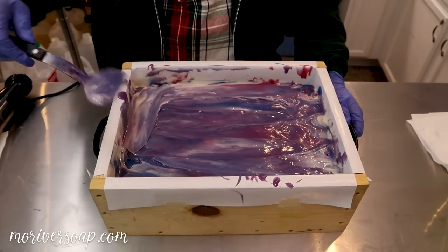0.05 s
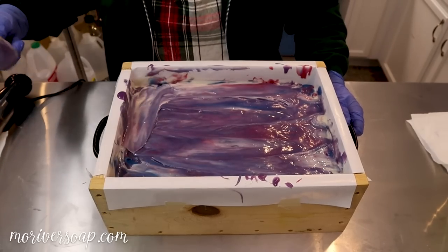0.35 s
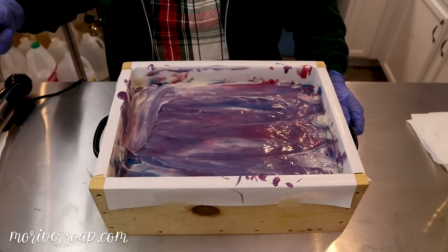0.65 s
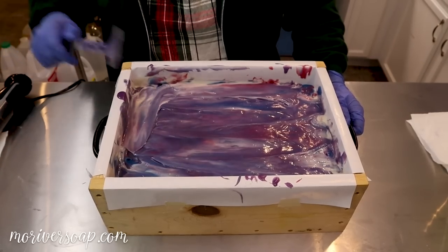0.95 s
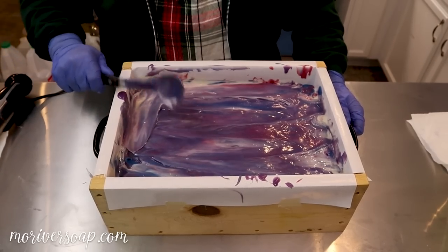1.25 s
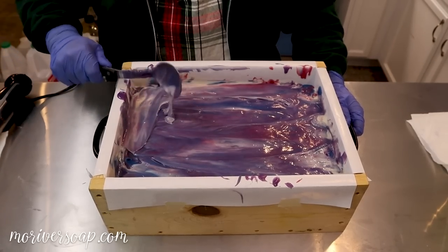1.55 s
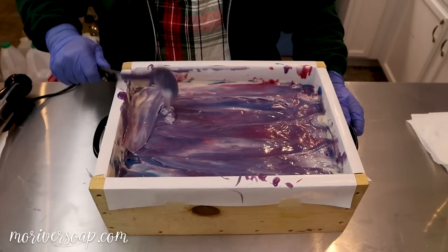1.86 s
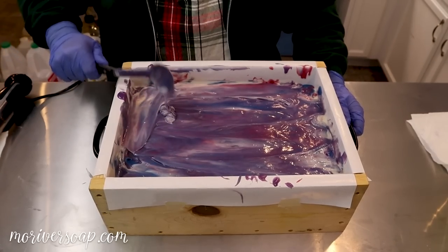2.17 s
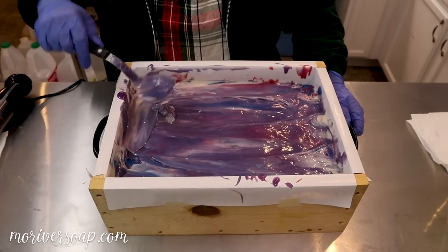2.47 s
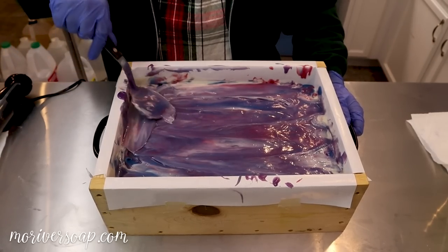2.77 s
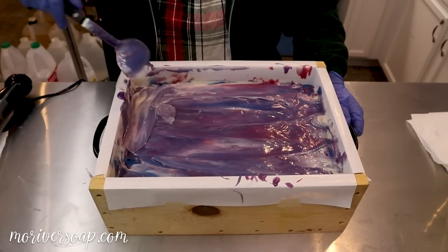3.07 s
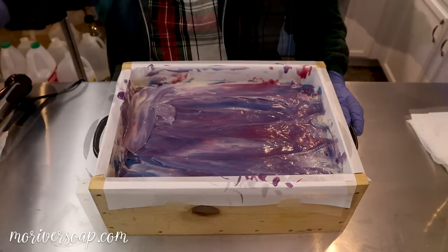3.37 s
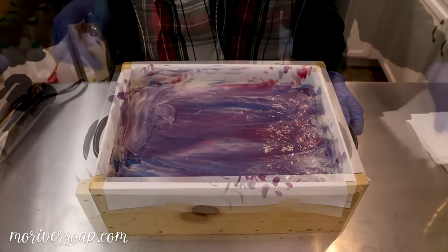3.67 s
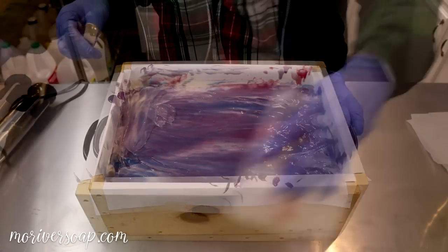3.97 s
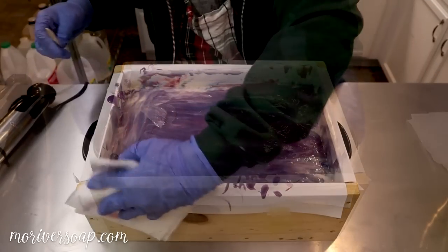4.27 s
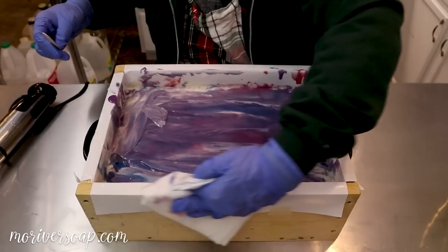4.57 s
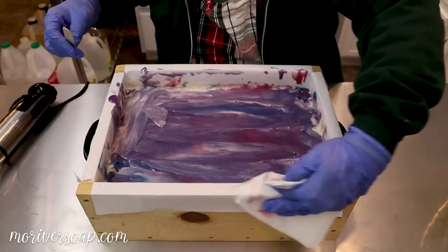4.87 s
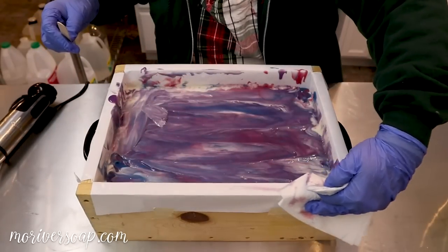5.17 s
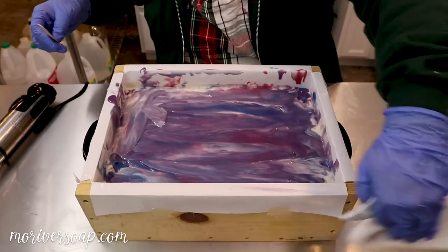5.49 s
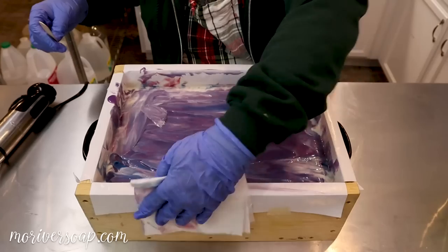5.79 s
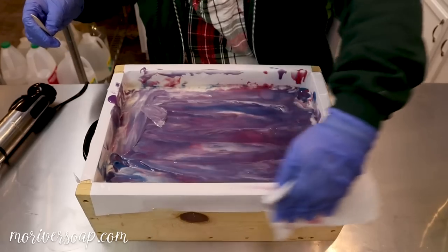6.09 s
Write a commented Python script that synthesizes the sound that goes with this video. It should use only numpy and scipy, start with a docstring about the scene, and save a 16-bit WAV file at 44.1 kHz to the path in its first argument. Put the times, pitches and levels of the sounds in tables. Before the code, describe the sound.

A metal spoon raps hard eight times on a wooden mold, quick and even, making the wood and the steel bench under it ring. A softer, dull knock and a light metal clink follow. Then the mold is bumped and a paper towel hisses along its paper-lined rim in several strokes, with small catches and one sharp crack. The microphone is close, in a small, hard-walled room.

```python
"""Rapping a spoon on a soap mold

A spoon raps eight times on a wooden mold to shake off thick batter; the wood and its steel bench ring.
A dull knock and a metal clink follow as the spoon is put away. The mold is bumped, and a paper towel
hisses along its paper-lined rim, catching as it goes. The room is small and hard. The raps overload
the one close microphone, and a faint hiss sinks after them and slowly returns."""
import sys
import numpy as np
from scipy import signal
from scipy.fft import rfft, irfft
from scipy.io import wavfile

SR = 44100
rng = np.random.default_rng(int(sys.argv[2]) if len(sys.argv) > 2 else 0)


def store_pcm(level_fs):
    """Save levels as 16-bit WAV."""
    pcm = np.round(np.clip(level_fs, -1, 1) * 32767).astype(np.int16)
    wavfile.write(sys.argv[1], SR, np.atleast_2d(pcm).T)


N = 275184
TIME, HZ = np.arange(N) / SR, np.fft.rfftfreq(N, 1 / SR)
TOP_HZ = 15900  # upper edge of the treble


def spoon_raps():
    """Eight hard raps on the mold, then one soft, dull knock."""
    # (time [s], wood level [dB], bench level [dB], place [0 mid-wall to 1 stiff corner],
    #  clack level [dB], clack brightness [dB per octave], pitch of the knock [factor])
    blows = [(1.2078, 0.5, 1, 0.14, -7.5, -2, 0.89), (1.3814, 0.5, 2, 0.03, 0, -1.5, 1),
             (1.5402, 3, .5, 0.25, 1, 6, 1.07), (1.7052, 1.5, 1, 0.72, -4, 0, 1.07),
             (1.8649, -3.5, .5, 0, -5, 0, 0.99), (2.0256, 0, -1.5, 1, 0, -7.5, 1.04),
             (2.187, 0, -1.5, 0.94, -6.5, -4.5, 1.038), (2.3516, 0, 1.5, 0.76, -8.5, -2.5, 0.99),
             (2.9264, -8, -24, .12, -31.5, -10.5, 0.884)]
    out = np.zeros(N)
    for s, *blow in blows:
        add(out, *knock(s, *blow))
    return out


def knock(s, wood_db, bench_db, place, clack_db, tilt_db, pitch, lead_s=0.0009):
    """The spoon clacks just before the wood answers; gives the start time and the sound with its echo."""
    # tone of the spoon hitting the rim: (frequency [Hz], level [dB])
    clack_tone = [(1500, -12), (2600, 6.5), (3800, 3.5), (5000, 2), (6000, 4.5), (8500, 3), (9600, 1),
                  (10600, -18), (14000, -10.5), (16000, -24.5)]
    wood = np.zeros(SR)
    add(wood, lead_s, mold_and_bench(wood_db, bench_db, place, pitch))
    tilted_tone = [(hz, db + tilt_db * np.log2(hz / 6000)) for hz, db in clack_tone]
    clack = amp(clack_db - 6) * colour(burst(length_s=0.0019), tilted_tone)
    echo = room(spread(amp(-5) * (wood + clack)))
    return s - lead_s, wood + clack + echo


def mold_and_bench(wood_db, bench_db, place, pitch, bench_hz=239.7, detune=0.019, scatter_db=2):
    """Struck wood and steel vibrate: the shortest notes make the knock, longer ones the boom and ring."""
    # natural notes of mold and bench: (frequency [Hz], level [dB], time to fade by 60 dB [s])
    notes = [(58, -43.5, 0.62), (87, -39, 0.15), (106.2, -34.5, 0.4), (120.6, -33, 0.26),
             (163.4, -32, 0.27), (200, -26, 0.039), (229.7, -20, 0.13), (249.4, -28, 0.38),
             (317.4, -32.5, 0.21), (445, -34, 0.078), (525, -32.5, 0.34), (591, -32.5, 0.18),
             (675, -28.5, 0.11), (721.4, -24, 0.18), (798, -27, 0.068), (775, -6.5, 0.025),
             (943, 6, 0.0064), (1193, -3, 0.0099), (1376, 8.5, 0.0086), (1650, -8.5, 0.0082),
             (2112, -7, 0.013), (2903, -11.5, 0.0073), (1510, -24.5, 0.067), (1456, -49, 1.4)]
    # how hard base board, side wall, rim and edge are shaken:
    # (frequency [Hz], level if hit mid-wall [dB], level if hit at a corner [dB])
    parts = [(650, 4, -28.5), (970, .5, 5.5), (1480, -4, -3), (2250, -7, 5.5)]
    hz, db, fade_s = np.transpose(notes)
    drive = [(f, wood_db + mid_db + place * (corner_db - mid_db)) for f, mid_db, corner_db in parts]
    db = db + read([(bench_hz, bench_db)] + drive, hz)  # the bench booms below bench_hz
    short = fade_s < 0.03
    # the spoon presses differently at every blow, nudging the higher ringing notes
    pitch_nudge, level_nudge = rng.standard_normal((2, len(hz))) * (~short & (hz > 400))
    hz = hz * np.where(short, pitch, 1 + detune * pitch_nudge)
    db = db + scatter_db * level_nudge
    return ring(np.transpose([hz, db, fade_s]), rise_s=0.0006)


def spoon_clink():
    """The spoon meets metal: a tick and a quickly fading ring, with their echo."""
    # when it lands: (time [s], level [dB])
    landings = [(3.7337, -17)]
    # natural notes of the spoon on metal: (frequency [Hz], level [dB], time to fade by 60 dB [s])
    notes = [(895, -26, 0.34), (1480, -29, 0.35), (3075, -1.5, 0.022), (2980, -23, 0.1),
             (3400, -4.5, 0.021), (4380, -26, .04), (4700, -16, 0.051), (5200, -2, 0.018),
             (6280, -5, 0.031), (7300, -9, 0.029), (7580, -19, .13), (9060, -9, 0.022), (9870, -10, 0.035),
             (11900, -19, 0.055), (13260, -18, .05), (14700, -19, .04)]
    # tone of the tick: (frequency [Hz], level [dB])
    tick_tone = [(150, -9.5), (420, -9.5), (880, 1.5), (1400, 2), (2000, -0.5), (2600, -7), (4000, -5),
                 (8000, -3.5), (10500, -16), (15500, -21)]
    out = np.zeros(N)
    for s, db in landings:
        metal = ring(notes, rise_s=0.00018)
        tick = amp(8) * colour(burst(length_s=0.0038), tick_tone)
        echo = room(amp(-5) * metal + amp(-2) * spread(tick))
        add(out, s, amp(db) * (metal + tick + echo))
    return out


def mold_bumps():
    """A soft hand nudges the mold and wakes only its low notes."""
    # nudges: (time [s], level [dB])
    nudges = [(4.189, -14), (4.599, -59), (5.139, -47), (5.486, -45), (5.981, -45)]
    # notes of the pushed mold: (frequency [Hz], level [dB], time to fade by 60 dB [s])
    notes = [(75, -30, 0.17), (137, -11, 0.21), (166, -8, 0.16), (196, -2, 0.052), (222, 7.5, 0.042),
             (277, -18, 0.23), (390, -8, 0.075), (540, -6, 0.023)]
    out = np.zeros(N)
    for s, db in nudges:
        add(out, s, amp(db) * ring(notes, rise_s=0.0019, rise_cycles=1.0))
    return out


def towel(fast_stroke_db=-35):
    """Fibres brush the rim in a hiss that brightens with speed; pressure adds a rasp and small slips."""
    # wipes: (start [s], speeding up [s], steady [s], slowing [s], speed [dB],
    #  pressure relative to speed [dB])
    strokes = [(3.875, 0.068, 0.021, 0.029, -34, -10), (4.229, .105, .02, .14, -40, -1),
               (4.34, .24, .42, .29, -34, -10), (5.25, 0.25, 0.01, 0.043, -34, -5),
               (5.625, 0.12, .014, 0.0068, -42.5, -4), (5.773, 0.044, 0.068, 0.024, -38, -6.5),
               (5.91, 0.066, 0.039, 0.14, -37.5, -10.5), (6.0, 0.12, .11, .1, -34.5, -22)]
    # tone of the fine hiss: (frequency [Hz], level [dB])
    hiss_tone = [(1290, -15), (2200, -7.5), (2430, -6.5), (3040, -6.5), (4350, -3.5), (4960, -6.5),
                 (5720, -3.5), (6210, -7), (7090, -3.5), (8370, 0.5), (10400, -14.5), (12700, -11.5),
                 (13600, -14), (16000, -25)]
    # tone of the high fizz of fast strokes: (frequency [Hz], level [dB])
    fizz_tone = [(5000, -37), (9000, 0), (11000, -5), (13500, 4), (16000, -8)]
    # tone of the coarse rasp: (frequency [Hz], level [dB])
    rasp_tone = [(120, -15), (300, -8.5), (600, -0.5), (1200, 6.5), (2000, 5), (3200, -1), (5500, -24.5)]
    speed = sum(gesture(*motion) for *motion, _ in strokes)
    pressure = sum(gesture(*motion) * amp(pressure_db) for *motion, pressure_db in strokes)
    hiss = amp(-1.38) * speed * grains(hiss_tone, per_s=16000)
    fizz = amp(-47) * (speed / amp(fast_stroke_db)) ** 2.1 * noise(fizz_tone)
    rasp = amp(-3) * pressure * grains(rasp_tone, per_s=3000)
    return hiss + fizz + rasp + towel_slips(pressure)


def towel_slips(pressure, per_s=18, centre_hz=1440, spread_octaves=0.35, spread_db=3.5):
    """Small catches at uneven intervals, as strong as the towel is pressed."""
    out = np.zeros(N)
    chances = rng.uniform(-1, 1, (int(N / SR * per_s), 3))
    for k, (late, size, pitch) in enumerate(chances):
        s = (k + 0.5 + 0.5 * late) / per_s
        hz = centre_hz * 2 ** (spread_octaves * pitch)
        add(out, s, amp(9.5 + spread_db * size) * snap(hz, length_s=0.0018))
    return out * pressure


def paper_lining():
    """The stiff paper lining catches on the towel and lets go; once it cracks sharply."""
    # the loudest catches: (time [s], level [dB], pitch [Hz], length [s])
    catches = [(4.392, -28, 2200, .009), (4.401, -22, 1900, .004), (4.413, -25, 1800, .001),
               (4.484, -24, 1530, .0024), (4.53, -24.5, 1570, 0.0019), (4.594, -21.5, 1566, 0.0087),
               (4.604, -20.5, 1390, 0.0035), (4.665, -24, 1320, 0.0022), (4.672, -21.5, 1640, 0.0025),
               (4.738, -27, 1660, 0.0044), (4.769, -27.5, 1220, 0.0033), (4.895, -23, 1290, .0012),
               (4.981, -26, 2040, 0.0056), (5.139, -17.5, 2130, 0.0017), (5.404, -33, 1240, 0.0036),
               (5.483, -21.5, 1240, 0.0041), (5.793, -32, 5000, .0027), (6.173, -22, 1900, 0.0016)]
    # the sharp crack: (time [s], level [dB])
    cracks = [(4.4537, -8.5)]
    # tone of the crack: (frequency [Hz], level [dB])
    crack_tone = [(200, -14), (500, -11), (950, 6), (1600, -5), (3000, 2), (4400, 1.5), (6500, 4.5),
                  (11000, 4.5), (16000, -6)]
    out = np.zeros(N)
    for s, db, hz, length_s in catches:
        add(out, s, amp(db) * snap(hz, length_s))
    for s, db in cracks:
        add(out, s, amp(db) * colour(burst(length_s=0.0018), crack_tone))
    return out


def handling_taps():
    """Faint taps as things are handled."""
    # light touches: (time [s], level [dB], pitch [Hz])
    touches = [(.052, -42.5, 3980), (.118, -48, 5500), (.350, -40, 650), (.435, -39, 550),
               (.461, -46.5, 900), (.619, -42, 1081), (.966, -43, 546), (3.578, -44, 650),
               (3.697, -44, 1000)]
    out = np.zeros(N)
    for s, db, hz in touches:
        add(out, s, amp(db) * snap(hz, length_s=0.0026))
    return out


def movement_and_hiss():
    """A sleeve swishes and the body shuffles, over a faint hiss that sinks after the raps and returns."""
    # the hiss dips and recovers, like a recorder turning itself down and up: (time [s], level [dB])
    hiss_levels = [(0, -56), (.55, -63), (1.2, -58.5), (2.7, -81.5), (3.2, -68.5), (3.7, -63), (4.0, -50.5),
                   (5.3, -54), (5.6, -53), (6.24, -56.5)]
    # a sleeve brushing: (start [s], rise [s], hold [s], release [s], level [dB])
    brushes = [(0.85, 0.068, 0.017, 0.11, -53)]
    # the soap maker shifting about: (start [s], rise [s], hold [s], release [s], level [dB])
    shifts = [(0.142, 0.37, 0.033, 0.2, -52), (0.624, .22, 0.11, 0.33, -55.5),
              (3.45, 0.14, 0.14, 0.17, -59), (3.7, 0.52, .3, 0.2, -48), (5.55, .1, .2, .3, -55)]
    # tone of the swish and the bright part of the hiss: (frequency [Hz], level [dB])
    bright_tone = [(700, -5.5), (1500, 0.5), (3200, 0.5), (5000, -1), (8500, -4), (10500, -8.5),
                   (15500, -15.5)]
    # tone of the shuffle and the dull part of the hiss: (frequency [Hz], level [dB])
    dull_tone = [(100, -11), (250, -4), (380, -9), (515, 3), (680, -6.5), (1200, -13), (3000, -27.5)]
    hiss = amp(np.interp(TIME, *np.transpose(hiss_levels)))
    bright = np.hypot(hiss, sum(gesture(*row) for row in brushes))
    dull = np.hypot(amp(-4) * hiss, sum(gesture(*row) for row in shifts))
    return bright * grains(bright_tone, per_s=7200, spread_db=-1.5) + dull * noise(dull_tone)


def room(x, first_echo_s=0.0017, early_db=3, early_s=0.014):
    """Dense echoes, strongest from the near surfaces, each pitch dying at its own speed."""
    # how long the room rings: (frequency [Hz], time to fade by 60 dB [s])
    fade_times = [(100, 0.62), (500, .42), (1400, 0.48), (4000, 0.46), (8000, 0.42), (15000, 0.06)]
    # tone of the echo: (frequency [Hz], level [dB])
    echo_tone = [(100, -6.5), (270, 0.5), (370, -3.5), (480, 3), (800, -4), (1500, -8), (3000, -7.5),
                 (8000, -8), (15000, -10.5)]
    hz, frame_s, bands = signal.stft(rng.standard_normal(SR), SR, nperseg=256)
    fade = amp(-60 * frame_s / read(fade_times, hz)[:, None])
    tail = signal.istft(bands * fade, SR, nperseg=256)[1][:SR]
    t = TIME[:SR]
    tail = tail * (t > first_echo_s) * amp(early_db * np.exp(-t / early_s))
    tail = colour(tail / np.linalg.norm(tail), echo_tone)
    return signal.fftconvolve(x, tail)[:len(x)]


def background(level_db=-61.5):
    """A faint, steady rumble and hiss."""
    # its tone: (frequency [Hz], level [dB])
    tone = [(15, -35), (25, -4), (92, -0.5), (195, 0.5), (427, -6.5), (531, -5.5), (1290, -14), (1400, -12),
            (1700, -14.5), (6380, -17), (10100, -18.5), (14800, -17.5), (16000, -16.5)]
    return amp(level_db) * noise(tone)


def spread(x):
    """A blow as the room gathers it from all sides: the same energy, with the gaps in its tone filled."""
    power, hz = abs(rfft(x)) ** 2, np.fft.rfftfreq(len(x), 1 / SR)
    tone = []
    for centre in np.geomspace(50, 17000, 50):
        nearby = (hz > centre / 1.15) & (hz < centre * 1.15)
        tone.append((centre, 10 * np.log10(power[nearby].mean() + 1e-12)))
    return colour(signal.unit_impulse(len(x)), tone)


def ring(notes, rise_s, rise_cycles=0.3):
    """Fading pure notes that build up while the contact lasts; the heavy low ones take longer."""
    hz, db, fade_s = np.transpose(notes)[:, :, None]
    t = TIME[:SR]
    waves = amp(db - 60 * t / fade_s) * np.sin(2 * np.pi * hz * t)
    build_up = 1 - np.exp(-t / (rise_s + rise_cycles / hz))
    return (waves * build_up).sum(0)


def burst(length_s):
    """The brief noise of two things touching: it rises quickly and dies away."""
    age = np.minimum(TIME[:SR] / length_s, 40)
    return rng.standard_normal(SR) * np.exp(-age) * (1 - np.exp(-6 * age))


def snap(hz, length_s, width=1.4):
    """A short burst of noise gathered around one pitch."""
    low, high = hz / width, min(hz * width, TOP_HZ)
    core = signal.lfilter(*signal.butter(1, [low, high], "band", fs=SR), burst(length_s))
    edge_trim = signal.butter(2, [hz * 0.26, min(hz * 3.6, TOP_HZ)], "band", fs=SR)
    return signal.lfilter(*edge_trim, core) * np.sqrt(SR / 2 / (high - low))


def gesture(start, rise_s, hold_s, release_s, db, depth_db=18.5, ease_db_per_s=1):
    """Strength of one arm movement: it swells, eases off slowly, and dies away."""
    t = TIME - start
    before = np.maximum(1 - t / rise_s, 0)
    after = np.maximum(t - rise_s - hold_s, 0) / release_s
    easing_db = ease_db_per_s * np.maximum(t - rise_s, 0)
    return amp(db - depth_db * (before + after) - easing_db)


def grains(tone, per_s, spread_db=0):
    """Many tiny random clicks that blend into noise of the given tone."""
    size = amp(spread_db * np.minimum(rng.exponential(1, N), 4))
    clicks = size * rng.standard_normal(N) * (rng.random(N) < per_s / SR)
    return unit(colour(clicks, tone))


def noise(tone):
    """Steady noise of the given tone."""
    return unit(irfft(rfft(rng.standard_normal(N)) * amp(read(tone, HZ)), N))


def colour(x, tone):
    """Gives a sound a tone, with a filter that never rings early, so clicks keep their sharp start."""
    hz = abs(np.fft.fftfreq(2048, 1 / SR))
    log_gain = np.log(amp(read(tone, hz)))
    response = np.exp(np.conj(signal.hilbert(log_gain)))
    return signal.oaconvolve(x, np.fft.ifft(response).real)[:len(x)]


def read(points, hz):
    """Reads between (frequency, value) points, on a scale of octaves."""
    point_hz, value = np.transpose(points)
    return np.interp(np.log(hz + 1), np.log(point_hz), value)


def add(mix, s, sound):
    """Mixes a sound in at s seconds."""
    part = mix[max(0, round(s * SR)):][:len(sound)]
    part += sound[:len(part)]


def amp(db):
    """Turns decibels into a multiplier."""
    return 10 ** (np.asarray(db) / 20)


def unit(x):
    """Scales a sound to an average strength (rms) of 1."""
    return x / np.sqrt(np.mean(x ** 2) + 1e-20)


def scene():
    """All sources in the room, heard from one point."""
    thuds = mold_bumps()
    light_sounds = paper_lining() + handling_taps() + towel()
    echo = room(amp(-6.5) * thuds + amp(-7.5) * light_sounds)
    mono = spoon_raps() + spoon_clink() + thuds + light_sounds + echo + movement_and_hiss() + background()
    return np.array([mono, mono])


def record(dry, low_cut_hz=47):
    """The microphone drops the deepest bass, flattens the loudest peaks and loses the highest treble."""
    bass_cut = signal.lfilter(*signal.butter(3, low_cut_hz, "high", fs=SR), dry)
    clipped = bass_cut / (1 + bass_cut ** 8) ** (1 / 8)
    treble_filter = signal.firwin(511, TOP_HZ, window=("kaiser", 9), fs=SR)
    return signal.oaconvolve(clipped, treble_filter[None], "same")


dry = scene()
out = record(dry)
store_pcm(out)
```